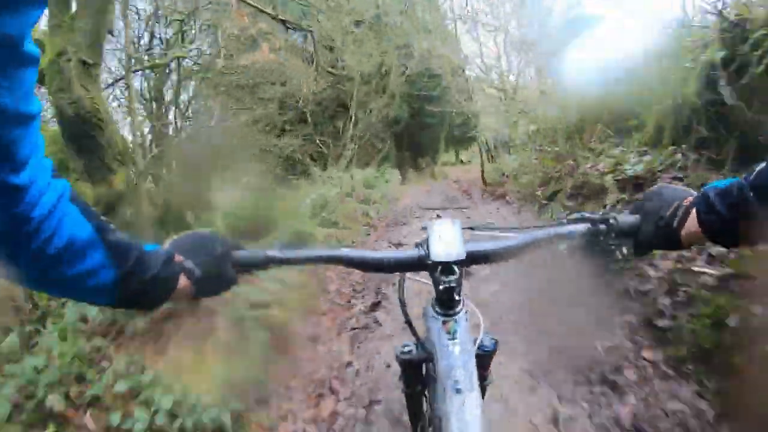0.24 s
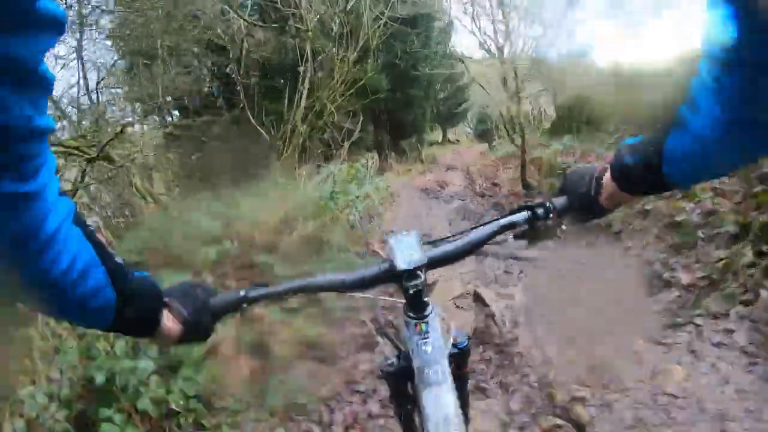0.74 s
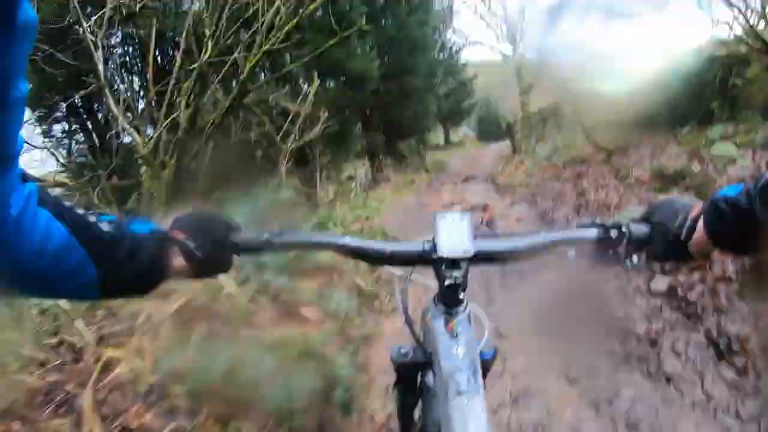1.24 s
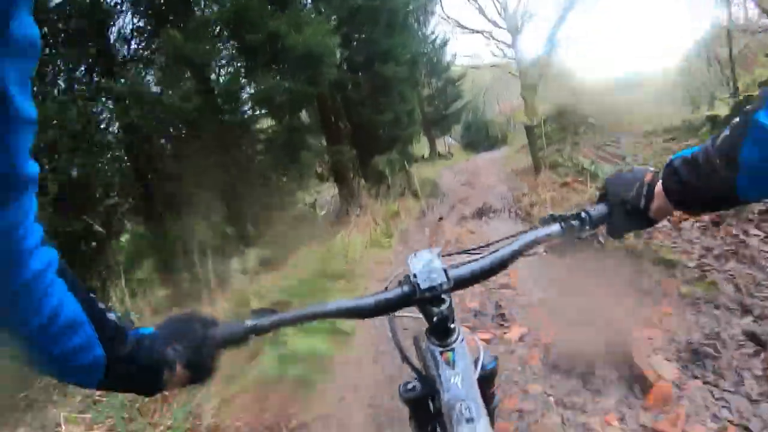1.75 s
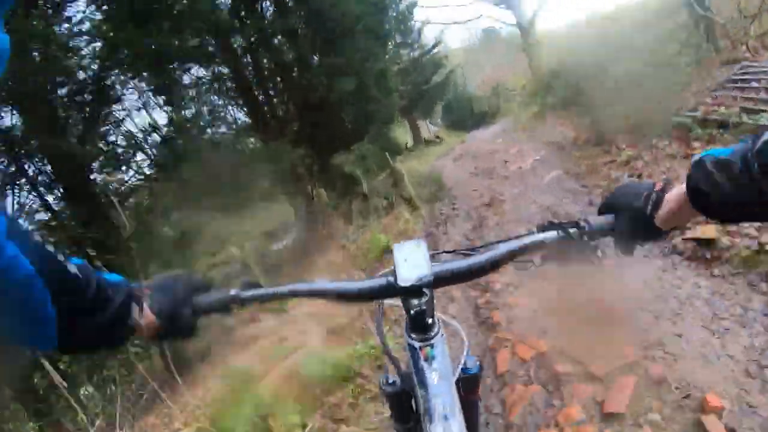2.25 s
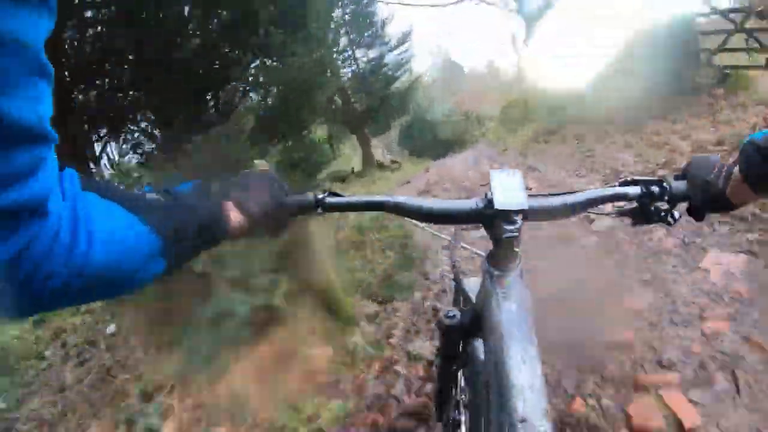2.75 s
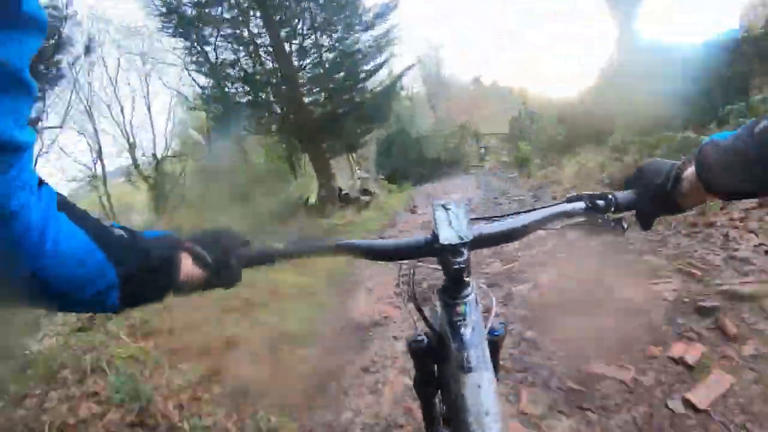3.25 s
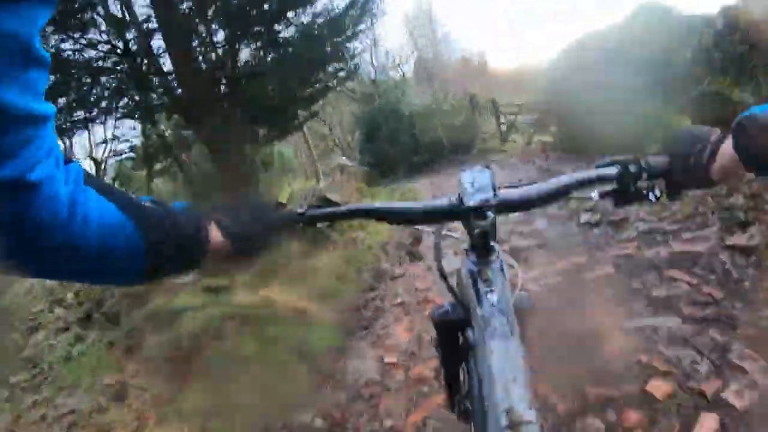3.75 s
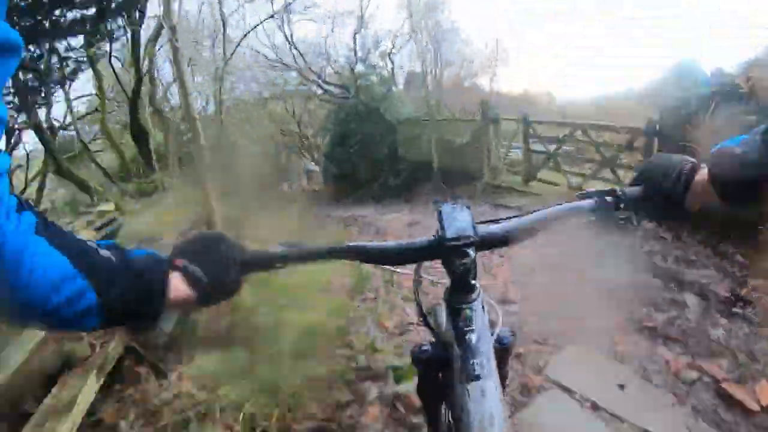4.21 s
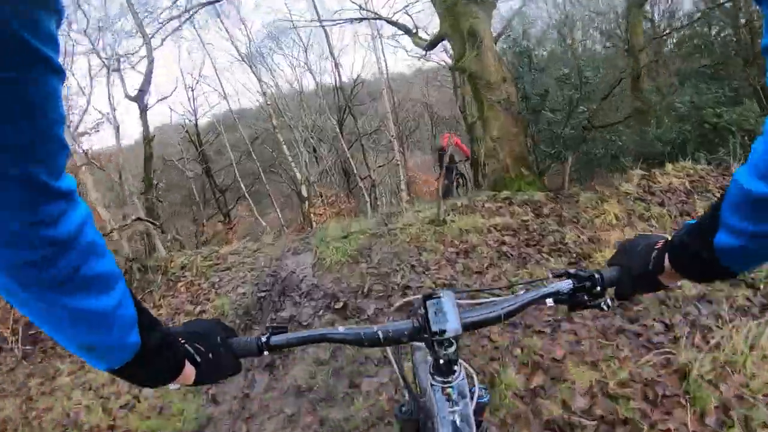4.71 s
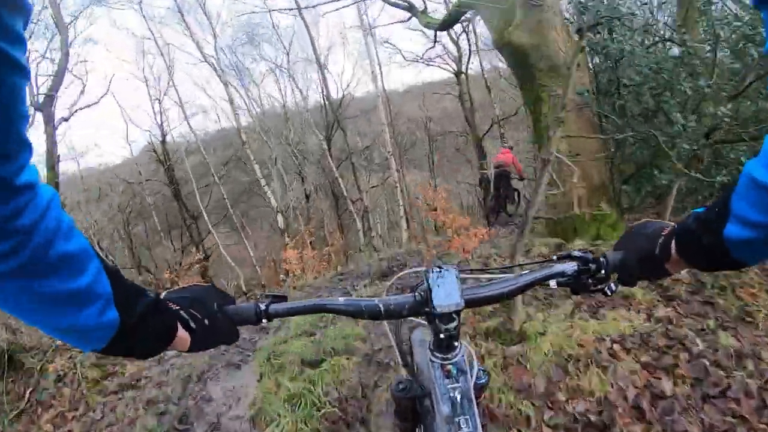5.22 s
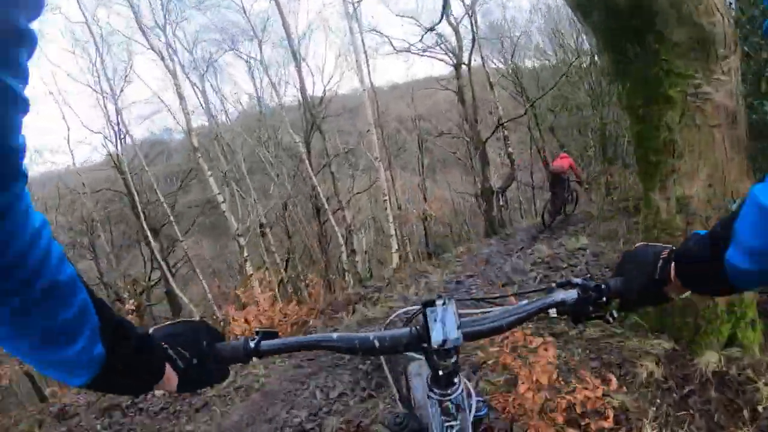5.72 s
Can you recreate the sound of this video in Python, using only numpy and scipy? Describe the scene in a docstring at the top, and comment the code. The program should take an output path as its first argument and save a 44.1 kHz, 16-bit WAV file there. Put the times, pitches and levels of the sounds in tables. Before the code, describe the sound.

Wind buffets a close microphone over gritty tyre hiss and chain slaps, then abruptly quieter rolling on wet leaves with a slowing ratchet tick.

```python
"""A mountain bike ride on a wet, stony woodland trail, heard by a small microphone on the rider's chest.
First the bike rolls fast: shaped noise makes the wind's thumps and roar and the hiss and spit of the tyres,
while short rings and noise bursts make chain and cables rattle over bumps.
At 4.55 s a hard cut leads to slow rolling: gusts over calmer air, crackling noise for wet leaves, a late
rattle, and a freewheel of ringing clicks that come ever slower."""
import sys
import numpy as np
from scipy import signal
from scipy.fft import rfft, irfft, next_fast_len
from scipy.io import wavfile
from scipy.ndimage import uniform_filter1d, map_coordinates

SR = 44100
rng = np.random.default_rng(int(sys.argv[2]) if len(sys.argv) > 2 else 0)


def wav_record(signal):
    """Record a signal, one row per channel, as 16-bit PCM in the file named by sys.argv[1]."""
    frames = np.transpose(np.atleast_2d(signal))
    bounded = np.clip(frames, -1, 1)
    # unit amplitude maps onto the largest positive 16-bit level
    quanta = np.round(bounded * 32767).astype(np.int16)
    wavfile.write(sys.argv[1], SR, quanta)


N = 263277  # samples in the whole sound
EDIT_S = 4.5507  # the fast stretch ends and the slow one begins


def amp(db):
    """Turn decibels into a gain."""
    return 10 ** (np.asarray(db) / 20)


def unit(x):
    """Scale a signal to an rms level of 1."""
    return x / np.sqrt(np.mean(x ** 2) + 1e-20)


def curves(rows):
    """Draw straight lines between table rows: one value per sample for each column after the time."""
    s, *cols = np.transpose(rows)
    return [np.interp(np.arange(N) / SR, s, c) for c in cols]


def wobble(rate):
    """A smooth random curve through a given number of random points a second."""
    steps = np.arange(0, N + 32, 32)
    smooth = map_coordinates(rng.standard_normal(3000), [steps * min(rate, 400) / SR])
    return np.interp(np.arange(N), steps, smooth)


def coloured(x, points):
    """Filter x by gains drawn through (pitch_hz, level_db) points on a log pitch axis."""
    m = next_fast_len(N + 8192)
    hz, db = np.transpose(points)
    log_hz = np.log(np.fft.rfftfreq(m, 1 / SR) + 1)
    gain = amp(np.interp(log_hz, np.log(hz + 1), db))
    return irfft(rfft(x, m) * gain, m)[:N]


def patchy(depth_db):
    """White noise with patches of random gain in time and pitch."""
    z = signal.stft(rng.standard_normal(N), nperseg=256)[2]
    field = uniform_filter1d(rng.standard_normal(z.shape), size=5, axis=0)
    field = uniform_filter1d(field, size=5, axis=1)
    return signal.istft(z * amp(depth_db * unit(field)), nperseg=256)[1][:N]


def burst(t, rise, t60):
    """The outline of a knock: a quick rise, then a decay of 60 dB in t60 seconds."""
    return (1 - np.exp(-t / rise)) * amp(-60 * t / t60)


# Wind on the fast stretch: start_s, buffet_db, roar_db
WIND_LEVELS = [(0.0, -17.5, -24.5), (0.25, -23.5, -33.5), (0.47, -14.5, -25.5), (0.6, -17.5, -31.5),
               (0.655, -29, -42), (0.72, -24.5, -38), (0.84, -18, -26), (1.55, -18.5, -20),
               (1.84, -24, -33), (1.95, -18.5, -26), (2.05, -22.5, -35), (2.41, -18.5, -24.5),
               (2.45, -25.5, -40), (2.52, -16.5, -23), (2.55, -18, -31.5), (2.9, -16, -20.5),
               (3.05, -19, -33.5), (3.32, -17.5, -25), (3.36, -21, -37.5), (3.67, -16.5, -21),
               (4.12, -18, -28), (4.16, -20.5, -29), (4.42, -18.5, -28), (4.465, -15.5, -27),
               (4.53, -11, -30), (4.55, -27, -29)]
# Gusts that hit the microphone port squarely: start_s, strength_db
DIRECT_HITS = [(0.065, -20.5), (0.441, -14.5), (0.8982, -17.5), (1.219, -10), (1.396, -7.5), (1.635, -10.5),
               (1.876, -13), (1.952, -20), (2.108, -10.5), (2.176, -13.5), (2.511, -14), (2.887, -24),
               (2.907, -12.5), (3.272, -11.5), (3.531, -18.5), (3.656, -22), (3.689, -6), (3.775, -11.5),
               (3.84, -23), (3.917, -8.5), (4.339, -13), (4.474, -15.5), (4.507, -8.5), (4.738, -22),
               (4.764, -19), (4.976, -18.5), (5.392, -18.5)]
# Balance of pitches in the large eddies: pitch_hz, level_db
BUFFET_COLOUR = [(12, -21), (20, -1.5), (48, 2.5), (107, 0.5), (189, -5.5), (239, -8.5), (400, -18.5),
                 (520, -25), (880, -120)]
# Balance of pitches in the small quick eddies: pitch_hz, level_db
PUFF_COLOUR = [(20, -34), (45, 4), (110, 2.5), (210, -4), (300, -19), (500, -82)]
# Balance of pitches in the fine turbulence: pitch_hz, level_db
ROAR_COLOUR = [(90, -42), (180, 6.5), (300, 13.5), (600, 9.5), (1000, 3), (1600, -11.5), (3000, -21),
               (5000, -100)]
PUFFS_FROM_S = 4.44  # from here on the eddies are small and quick
CALM_DB, CALM_ROAR_DB = -36.5, -57  # buffet and roar between gusts on the slow stretch


def wind():
    """Eddies thump the port; fine turbulence roars with them and on direct hits, which kick the diaphragm."""
    fast = np.arange(N) < EDIT_S * SR
    buffet_db, roar_db = np.where(fast, curves(WIND_LEVELS), gusts())

    eddies = wobble(22.31)
    air = rng.standard_normal(N) * amp(2.0 * eddies)
    deep = unit(coloured(air, BUFFET_COLOUR))
    puffs = unit(coloured(rng.standard_normal(N), PUFF_COLOUR))
    buffet = np.where(np.arange(N) < PUFFS_FROM_S * SR, deep, puffs)

    # the roar grows with the strength of the buffet, whichever way it pushes
    strength = np.sqrt(np.abs(uniform_filter1d(buffet ** 2, size=300))) + 1.6
    bursts = strength ** 0.8 * amp(2.3 * eddies + 3.5 * wobble(180))
    roar = unit(rng.standard_normal(N) * bursts) * amp(roar_db)

    thuds, t = np.zeros(N), np.arange(SR // 10) / SR
    for s, db in DIRECT_HITS:
        at = slice(round(s * SR), round(s * SR) + len(t))
        thuds[at] += amp(db + 6) * burst(t, rise=0.0011, t60=0.024) * np.cos(2 * np.pi * 170 * t)
        outline = 0.66 * burst(t, rise=0.0052, t60=0.059) + 1.8 * burst(t, rise=0.0014, t60=0.01)
        roar[at] += amp(db) * outline * rng.standard_normal(len(t))

    roar = coloured(roar, ROAR_COLOUR)
    soft = coloured(roar, [(350, 4.0), (800, -6.5)])  # slower air sheds larger, duller eddies
    return thuds + amp(buffet_db) * buffet + np.where(fast, roar, soft + amp(CALM_DB) * deep)


# Gusts on the slow stretch: peak_s, buffet_db, build_up_s
GUST_PEAKS = [(4.56, -22, 0.022), (4.775, -20, 0.24), (4.98, -26, 0.35), (5.179, -30, 0.13),
              (5.4, -18, 0.049), (5.503, -28, 0.072), (5.66, -27, 0.044), (5.73, -28, 0.068),
              (5.94, -30, 0.028)]
GUST_EDGE_DB = 20.5  # climb during the build-up
GUST_FALL_DB_PER_S = 312
ROAR_GROWS = 1.7  # roar dB per buffet dB


def gusts():
    """Each gust climbs to its peak, then dies quickly; above calm the roar swings wider than the buffet."""
    t = np.arange(N) / SR
    peak_s, db, build = np.transpose(GUST_PEAKS)[..., None]
    climb = GUST_EDGE_DB * (peak_s - t) / build
    fall = GUST_FALL_DB_PER_S * (t - peak_s)
    buffet_db = (db - np.where(t < peak_s, climb, fall)).max(axis=0)  # the strongest gust wins
    over_calm_db = np.maximum(buffet_db - CALM_DB, 0)
    return buffet_db, CALM_ROAR_DB + ROAR_GROWS * over_calm_db


# Tyre noise on the fast stretch, before bumps: start_s, tread_db
TYRE_LEVELS = [(0, -40.5), (.54, -42), (.78, -41.5), (1.0, -38.5), (1.3, -33.5), (1.5, -33.5), (1.75, -42),
               (2.2, -44), (2.48, -39), (3.19, -39.5), (3.45, -41.5), (4.0, -40.5), (4.16, -40),
               (4.55, -41)]
# Balance of pitches in the tread noise: pitch_hz, level_db
TREAD_COLOUR = [(400, -16), (900, -9.5), (1500, -6), (2700, -2.5), (3300, -7), (4600, -12), (5500, -24),
                (7000, -100)]
# Balance of pitches in the water spray: pitch_hz, level_db
SPRAY_COLOUR = [(4500, -41), (5600, -7), (6500, -2.5), (7800, -4), (8900, -12), (10300, -14.5),
                (11000, -22), (11800, -34)]
SPRAY_DB = -16.5  # relative to the tread, before bumps


def tyres():
    """Tread noise swells as the wheel loads over bumps; grit crackles, pebbles ping and water sprays."""
    tread_db, = curves(TYRE_LEVELS)
    rough_db = bumps()
    load = amp(2.1 * wobble(120))

    stones = grit(count=2200)
    tread = unit(coloured(load * (patchy(depth_db=1.0) + 0.47 * stones), TREAD_COLOUR))
    tread = tread + 0.58 * pebbles(count=2400, low_hz=890, high_hz=4600)

    flecks = stones + grit(count=1200)
    spray = unit(coloured(load * (patchy(depth_db=0.0) + 0.29 * flecks), SPRAY_COLOUR))
    # bumps lift the spray more than the tread
    rolling = amp(rough_db) * tread + amp(SPRAY_DB + 1.5 * rough_db) * spray
    return amp(tread_db) * rolling * (np.arange(N) < EDIT_S * SR)


# Rough patches that load the tyres: middle_s, half_length_s, swell_db
ROUGH_PATCHES = [(0.367, 0.03, 4.5), (0.44, 0.031, 6), (0.51, 0.034, 5.5), (0.6, 0.031, 6.5),
                 (0.848, 0.041, 4.5), (0.988, 0.033, 3), (1.27, 0.064, 2.5), (1.755, 0.033, 3.5),
                 (1.889, 0.03, 4), (1.972, .04, 4.5), (2.113, 0.043, 5), (2.302, 0.088, 6), (2.54, 0.1, 2),
                 (2.77, 0.082, 3.5), (2.97, 0.05, 2), (3.128, 0.058, 3), (3.255, 0.077, 4),
                 (3.601, 0.026, 4), (3.8, 0.046, 3), (4.121, 0.019, 6), (4.257, 0.044, 6),
                 (4.322, 0.039, 6), (4.375, 0.015, 5), (4.494, 0.05, 3)]


def bumps():
    """Each rough patch lifts the tyre noise quickly, holds it and lets it drop, in dB."""
    s, half, db = np.transpose(ROUGH_PATCHES)[..., None]
    distance = (np.arange(N) / SR - s) / half
    return (db * np.clip(1 - distance ** 4, 0, 1)).sum(axis=0)


def grit(count):
    """Small stones and mud flecks: scattered bursts of noise a few milliseconds long."""
    when, size, life = rng.random((count, 3)).T[..., None]
    t = np.arange(SR // 80) / SR
    outline = amp(20.0 * size ** 2) * burst(t, rise=0.0011, t60=0.0016 + 0.0094 * life)
    grains = outline * rng.standard_normal((count, len(t)))
    at = (when * N).astype(int) + np.arange(len(t))
    return unit(np.bincount(at.ravel(), grains.ravel(), minlength=N)[:N])


def pebbles(count, low_hz, high_hz):
    """Stones flicked against each other and the frame: short pings, each at its own pitch."""
    when, size, life, pitch = rng.random((count, 4)).T[..., None]
    t = np.arange(SR // 50) / SR
    hz = low_hz * (high_hz / low_hz) ** pitch
    outline = amp(15.5 * size ** 2) * burst(t, rise=0.0012, t60=0.0024 + 0.0081 * life)
    pings = outline * np.sin(2 * np.pi * hz * t)
    at = (when * N).astype(int) + np.arange(len(t))
    together = np.bincount(at.ravel(), pings.ravel(), minlength=N)[:N]
    return unit(coloured(together, TREAD_COLOUR[1:]))


# Slaps of chain or cable: start_s, strength_db, stronger_pitch_hz, weaker_pitch_hz
SLAPS_ON_FRAME = [(.3446, -24, 2750, 3340), (.4204, -19, 2800, 2050), (.4354, -15, 2880, 2050),
                  (.4508, -20, 2020, 3140), (.5094, -23, 2240, 2970), (.5915, -10, 2590, 2150),
                  (.7023, -15, 1640, 3780), (.7636, -22, 2670, 1590), (.7741, -19.5, 2720, 1930),
                  (.8995, -19.5, 3280, 2670), (.9773, -17, 1940, 2800), (1.0718, -18, 1700, 3000),
                  (1.1495, -22, 2970, 1680), (1.183, -13.5, 3380, 2000), (1.2464, -16, 2270, 1350),
                  (1.3901, -14.5, 1890, 2500), (1.4625, -15, 2220, 1460), (1.6056, -16, 2270, 3190),
                  (2.5157, -23, 2050, 1220), (2.5336, -20, 1580, 3000), (2.5608, -24, 1740, 2560),
                  (2.7151, -14.5, 3110, 1790), (2.7689, -15, 1810, 2300), (2.7828, -16.5, 1520, 2860),
                  (2.8984, -13.5, 1980, 1430), (3.1188, -16.5, 2500, 3300), (3.2491, -15, 2100, 1570),
                  (3.2753, -17, 1590, 2370), (3.3563, -17, 2040, 3180), (3.4211, -17, 2060, 1600),
                  (3.4353, -14.5, 2730, 2130), (3.7358, -12.5, 2070, 3000), (3.8087, -20.5, 2890, 2110),
                  (3.8599, -18.5, 1990, 2840), (4.0515, -16.5, 1550, 2880), (4.1042, -30, 2630, 2130),
                  (4.1214, -18, 2030, 1500), (4.2472, -29, 2820, 4400), (4.3478, -19, 2030, 2760),
                  (4.4752, -12.5, 2040, 2930), (5.8072, -22, 1807, 3060)]


def rattles():
    """Jolts slap chain or cable on the frame: two brief rings, a crack with clattering rebounds, a bright edge."""
    ring, clatter, edge = np.zeros((3, N + SR))
    t = np.arange(SR // 10) / SR
    for s, db, hz, other_hz in SLAPS_ON_FRAME:
        at = slice(round(s * SR), round(s * SR) + len(t))
        wander, clatter_noise, edge_noise = rng.standard_normal((3, len(t)))
        drift = np.cumsum(wander) * 0.066  # loose parts do not hold their phase
        strong = np.sin(2 * np.pi * hz * t + drift)
        weak = amp(-4.5) * np.sin(2 * np.pi * other_hz * t - drift)
        ring[at] += amp(db + 6.5) * burst(t, rise=0.0009, t60=0.023) ** 2 * (strong + weak)

        crack = burst(t, rise=0.0019, t60=0.01)
        rebounds = amp(-3.5) * burst(t, rise=0.0022, t60=0.076)
        clatter[at] += amp(db + 1.0) * (crack + rebounds) * clatter_noise
        edge[at] += amp(db - 17.5) * burst(t, rise=0.001, t60=0.02) * edge_noise
    rings = coloured(ring[:N], [(5000, -1.5), (11000, -43)])
    return rings + coloured(clatter[:N], TREAD_COLOUR[1:]) + coloured(edge[:N], SPRAY_COLOUR)


# Wet leaves on the slow stretch: start_s, squelch_db, share of the higher tone (0-1)
LEAF_LEVELS = [(4.551, -44, 1), (4.72, -44.5, 0.97), (5.185, -48, 0.9), (5.29, -38.5, 0.8), (5.37, -39, 0),
               (5.5, -46, 0.6), (5.555, -36.5, 1), (5.6, -43.5, 0.6), (5.79, -45.5, 0.95),
               (5.97, -41, 0.55)]
# Balance of pitches in the rustle: pitch_hz, level_db
RUSTLE_COLOUR = [(1000, 2), (1700, -4), (2100, 0.5), (2700, 5), (3200, 0), (4600, -2), (5400, -16),
                 (7600, -10.5), (9000, -19), (10400, -18), (12000, -29), (14100, -36)]
# Balance of pitches in the lower squelch tone: pitch_hz, level_db
SQUELCH_COLOUR = [(200, -28), (450, -6), (750, -6.5), (1000, -8.5), (1500, -66)]
RUSTLE_DB = -40
SQUELCH_UP = 1.87  # pitch of the higher tone over the lower


def leaves():
    """Slow rolling over wet litter: a fine crackling rustle over a hollow squelch."""
    squelch_db, high = curves(LEAF_LEVELS)
    crackle = amp(0.42 * wobble(4.76) + 1.8 * wobble(90))
    rustle = unit(coloured(crackle * patchy(depth_db=1.45), RUSTLE_COLOUR))

    mud = amp(2.6 * wobble(30)) * patchy(depth_db=0.5)
    low_tone = unit(coloured(mud, SQUELCH_COLOUR))
    high_tone = unit(coloured(mud, np.multiply(SQUELCH_COLOUR, [SQUELCH_UP, 1])))
    squelch = np.sqrt(1 - high) * low_tone + np.sqrt(high) * high_tone
    return (amp(RUSTLE_DB) * rustle + amp(squelch_db) * squelch) * (np.arange(N) >= EDIT_S * SR)


# The slowing wheel: start_s, pawl drops a second
WHEEL_RATE = [(4.557, 69.1), (4.997, 57.7), (5.297, 48.4), (5.597, 46.4), (5.657, 34.4), (5.967, 31.1)]
# Rings of the hub, strength before random scatter: pitch_hz, level_db, time to fade by 60 dB (s)
HUB_RINGS = [(8000, -4, 0.023), (8200, 0, 0.012), (10000, -3, 0.02)]
FIRST_DROP = 0.22  # share of a tooth still to go at the first row
PAWL_DB, PAWL_SCATTER_DB = -44.5, 1.5
PAWL_GAIN_DB_PER_S = 3  # drops grow firmer as the wheel slows


def freewheel():
    """Pawls drop over ratchet teeth as fast as the wheel turns, ringing the hub at new strengths each time."""
    hub, t = np.zeros(N + SR), np.arange(SR // 30) / SR
    rate, = curves(WHEEL_RATE)
    turning = np.arange(N) >= WHEEL_RATE[0][0] * SR
    teeth = np.cumsum(rate * turning) / SR - FIRST_DROP
    # a pawl drops each time the tooth count passes a whole number
    for at in np.flatnonzero(np.diff(np.floor(teeth))):
        tick = amp(3.0) * burst(t, rise=0.00095, t60=0.036) * np.diff(rng.standard_normal(len(t) + 1))
        for hz, level_db, t60 in HUB_RINGS:
            strength = amp(level_db + rng.normal(0, 4.1))
            tick += strength * burst(t, rise=0.0015, t60=t60) * np.sin(2 * np.pi * hz * t)
        firmer_db = PAWL_GAIN_DB_PER_S * (at / SR - EDIT_S)
        scatter_db = PAWL_SCATTER_DB * rng.standard_normal()
        hub[at:][:len(t)] += amp(PAWL_DB + firmer_db + scatter_db) * tick
    return coloured(hub[:N], [(4500, -18), (6500, 2.5), (10500, -10.0), (14000, -42)])


def scene():
    """Add all the sources at one microphone."""
    return (wind() + tyres() + rattles() + leaves() + freewheel())[None]


EDIT_DB = -15.5  # size of the pressure step at the cut
FAST_TOP_HZ, SLOW_TOP_HZ, TOP_HZ = 11900, 14150, 15800  # highest pitch: fast stretch, slow stretch, overall


def below(x, hz):
    """Remove pitches above hz with a steep slope."""
    return coloured(x, [(hz, 0), (hz + 200, -120)])


def record(dry):
    """Soft overload and band limits; the cut ends in a pressure trough and fades the slow stretch in."""
    x = dry[0] / np.sqrt(1 + np.abs(dry[0] / 0.75) ** 2)
    since = np.arange(N) / SR - EDIT_S
    x = np.where(since < 0, below(x, FAST_TOP_HZ), below(x, SLOW_TOP_HZ))
    fade_s = np.where(since < 0, 0.0015, 0.006)  # out, then in
    join = 1 - np.exp(-np.abs(since) / fade_s)
    trough = amp(EDIT_DB) * (1 - join) * (since < 0)
    return below(x * join - trough, TOP_HZ)[None]


dry = scene()
out = record(dry)
wav_record(out)
```